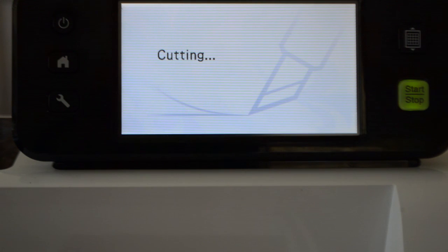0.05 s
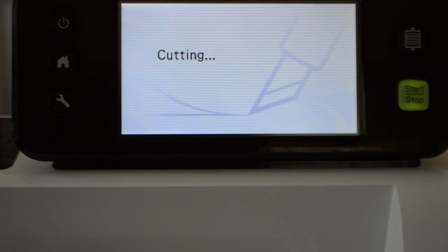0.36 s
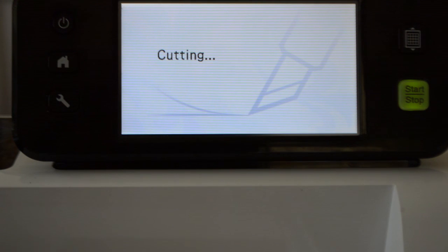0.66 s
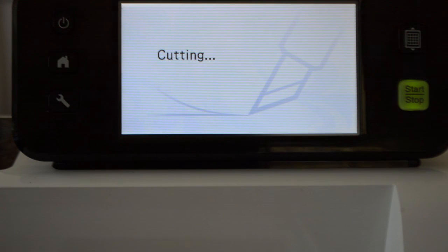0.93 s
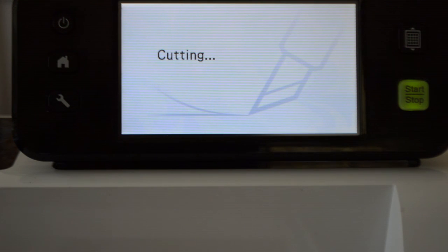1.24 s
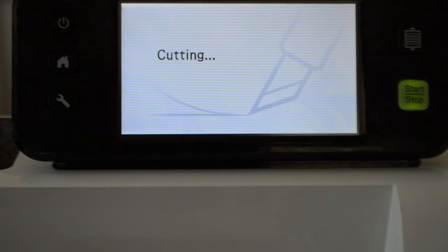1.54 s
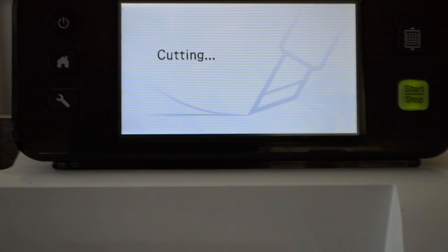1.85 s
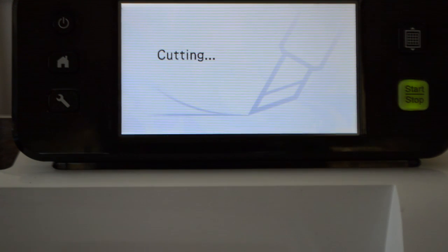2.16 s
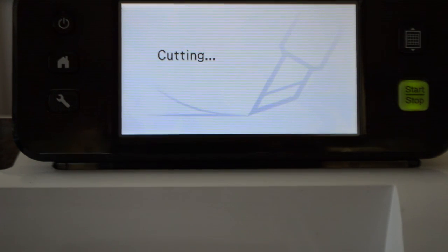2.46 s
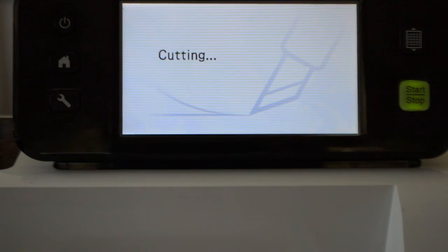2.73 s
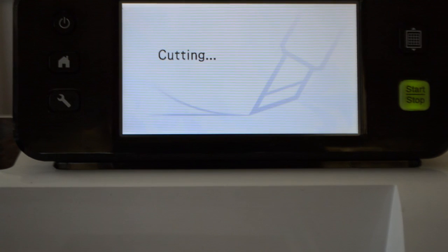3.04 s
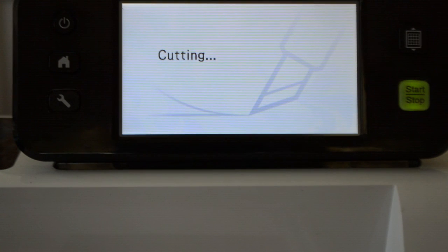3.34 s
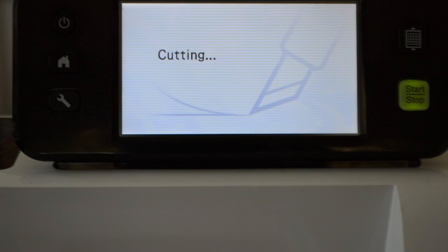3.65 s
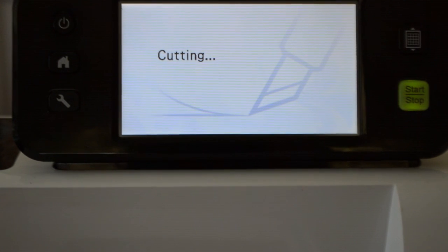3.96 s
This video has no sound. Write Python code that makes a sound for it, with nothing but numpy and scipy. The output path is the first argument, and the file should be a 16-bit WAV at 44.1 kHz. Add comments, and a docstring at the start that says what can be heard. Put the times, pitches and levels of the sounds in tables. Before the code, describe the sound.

Close up in a small room, an electronic cutting machine whirs in stop-start bursts, its plastic housing shuddering at each turn. A quieter, faster stretch ends in sharp ticks before louder whining returns, with blade holder clunks and brief rattles.

```python
"""A desktop cutting machine works close by, indoors. It opens with stepper motors whining over a hiss
of gears and belts and a ringing rail; at the turns their steps shake the housing and loose parts rattle.
The blade holder ticks as it lifts, the resting motors hum, and at 0.67 s the holder clunks down.
A faster, softer run ends in a flurry of ticks and a second rest. From 1.75 s heavy and light runs
trade places, with two more clunks and two more ticks."""
import sys
import numpy as np
from scipy import signal
from scipy.fft import rfft, irfft, next_fast_len
from scipy.io import wavfile
from scipy.ndimage import uniform_filter1d

SR = 44100
rng = np.random.default_rng(int(sys.argv[2]) if len(sys.argv) > 2 else 0)


def unload_audio(sound):
    """Save the sound as a 16-bit wav file, at the path given as the first command line argument."""
    columns = np.transpose(np.atleast_2d(sound))
    # keep every value between -1 and 1, then stretch to whole-number steps
    steps = np.round(np.clip(columns, -1, 1) * 32767)
    wavfile.write(sys.argv[1], SR, steps.astype(np.int16))


N = 176400
T = np.arange(N) / SR

CRUISE_HZ, FAST_HZ, SLOWED_HZ = 668, 955.4, 893  # step rates
# steady motor runs: start_s, end_s, step_hz, whine_db, low_overtones_db, whistle_db, hiss_db, rumble_db
LIGHT_RUNS = [(-.05, .212, CRUISE_HZ, -33, -39.5, -37, -35, -39),
              (1.995, 2.587, CRUISE_HZ, -30.5, -37, -45, -34, -35),
              (3.065, 3.64, CRUISE_HZ, -29.5, -40, -38.5, -35, -38.5)]
HEAVY_RUNS = [(.308, .448, CRUISE_HZ, -22, -35.5, -52, -32, -28.5),
              (.478, .535, CRUISE_HZ, -23.5, -31.5, -55, -40, -31),
              (1.765, 1.9, CRUISE_HZ, -20, -34.5, -21, -30.5, -29.5),
              (1.93, 1.98, CRUISE_HZ, -18, -51, -50, -34, -22),
              (2.68, 2.968, CRUISE_HZ, -18.5, -34.5, -39, -30, -28),
              (3.724, 3.858, CRUISE_HZ, -21, -38.5, -38, -31, -29.5),
              (3.895, 3.945, CRUISE_HZ, -22.5, -36, -55, -39.5, -27)]
FAST_RUNS = [(.71, 1.61, FAST_HZ, -39.5, -57, -40, -38.5, -51.5),
             (1.625, 1.705, SLOWED_HZ, -37.5, -59, -53, -40, -33.5)]
# overtones of the whine: step_multiple, relative_db
LIGHT_OVERTONES = [(2, -0.5), (6, -12), (8, -7), (10, -14)]
HEAVY_OVERTONES = [(2, -1.5), (8, -23)]
FAST_OVERTONES = [(2, 2), (3, 3), (4, -7), (8, -31)]
# EQ of the gear and belt hiss: frequency_hz, relative_db
LIGHT_HISS = [(940, -62), (1600, -15), (2070, -2), (2700, -4), (3210, -1.5), (5540, -1.5), (6270, -4),
              (9370, 0.5), (10600, 0), (11900, -11.5), (13200, -7.5), (15700, -18)]
HEAVY_HISS = [(940, -35), (1500, -6), (1850, -3.5), (2170, 4), (2750, -7.5), (3540, -1), (4240, -5.5),
              (5040, 2), (6000, -13), (6900, -4.5), (7350, 2), (11100, -5.5), (11800, -20), (13300, -12),
              (15700, -24)]
FAST_HISS = [(940, -11.5), (2750, -14.5), (3700, -10.5), (4850, -4), (6460, -14), (9280, -7),
             (11000, -11.5), (15700, -23)]
# EQ of the drive rumble: frequency_hz, relative_db
LIGHT_RUMBLE = [(50, -62), (100, -10.5), (205, 5.5), (300, -2), (450, -5.5), (640, 4), (800, -3.5),
                (1200, -9.5), (1520, -5.5), (2000, -21.5)]
HEAVY_RUMBLE = [(55, -38), (120, -16), (172, 2), (385, -1.5), (455, -3.5), (785, -2.5), (1480, -6.5),
                (2050, -18.5)]
FAST_RUMBLE = [(40, -21), (195, 7), (650, 1.5), (1200, -8.5), (1550, -0.5), (2000, -29)]
# gear tones tucked under the whine: pitch_hz, relative_db
LIGHT_GEARS = [(194, -19.5), (301, -20.5)]
HEAVY_GEARS = [(167, -21.5), (388, -17.5), (586, -15.5), (780, -15), (974, -22.5)]
FAST_GEARS = [(199, -7.5), (1513, -13.5), (1674, -18), (4974, -11)]
# a motor brakes or restarts: start_s, end_s, from_step_hz, to_step_hz, level_db, bass_boost_db
JUDDERS = [(0.217, 0.242, 672, 382.7, -23.5, 15), (0.238, 0.297, 167.9, 418.8, -16, 8.5),
           (0.282, 0.33, 419.3, 684, -20, 20), (0.445, 0.471, 667, 327.4, -17, 7),
           (.478, .497, 335.3, 674, -21.5, 4), (0.524, 0.553, 658, 261.2, -19.5, 9.5),
           (0.66, 0.717, 179.6, 556.6, -18.5, 12.5), (0.852, 0.943, 173.2, 202.4, -37.5, 14),
           (1.603, 1.633, 915, 289, -28, 18), (1.744, 1.769, 207.8, 701.4, -16, 14),
           (1.897, 1.926, 657, 338, -20, 11), (1.926, 1.987, 171.6, 422.8, -17, 9.5),
           (1.988, 2.027, 410, 646, -28.5, 19), (2.584, 2.629, 680, 248, -24, 18),
           (2.641, 2.691, 170.4, 608.8, -16.5, 15.5), (2.963, 2.997, 660.6, 331.7, -19, 8.5),
           (2.993, 3.025, 256.8, 422.5, -14, 5.5), (3.027, 3.056, 420, 636, -23, 28),
           (3.643, 3.673, 644.4, 305.5, -24, 19.5), (3.675, 3.712, 168.1, 423.8, -14, 11.5),
           (3.713, 3.743, 415, 668, -21, 20), (3.86, 3.881, 649, 333.4, -16.5, 10),
           (3.891, 3.911, 320.6, 656, -24.5, 10), (3.939, 3.966, 659, 256.6, -18, 8.5)]
# modes of the plastic housing: pitch_hz, gain_db, t60_s
HOUSING_MODES = [(178.7, -18.5, 0.14), (243, -18, 0.074), (283.4, -8, 0.028), (342, -12, 0.05),
                 (371, -17.5, 0.094), (541.7, -15.5, 0.52), (585, -17, 0.33), (651.8, -1.5, 0.072),
                 (776, 5.5, 0.025), (903, -6, 0.062), (981, -7.5, 0.13), (1120, -12.5, 0.068),
                 (1167, -13.5, 0.072), (1377, -10.5, 0.034), (1480, -4.5, 0.014)]
# bursts of loose-part chatter: start_s, end_s, level_db
RATTLES = [(0.2517, 0.269, -21.5), (0.275, 0.292, -24), (0.66, 0.664, -25.5), (0.6661, 0.674, -21),
           (1.749, 1.757, -28), (1.926, 1.931, -23), (1.94, 1.964, -26.5), (1.966, 1.985, -26.5),
           (2.609, 2.602, -23.5), (2.626, 2.638, -23), (2.6445, 2.666, -23.5), (3, 3.022, -26),
           (3.6741, 3.679, -25.5), (3.687, 3.713, -26.5)]
# EQ of the chatter: frequency_hz, relative_db
RATTLE_EQ = [(500, -7), (1250, 10.5), (1900, 1.5), (4000, 6.5), (7000, 7), (9400, 4), (10600, -4.5),
             (12200, -8.5), (15700, -28)]
# metal modes of the carriage: pitch_hz, gain_db
CARRIAGE_MODES = [(4812, -22.5), (6705, -9.5), (8815, -8), (11350, -19.5)]
# the blade holder lands: start_s, strike_db
CLUNKS = [(.6665, -11.5), (1.7485, -24), (2.6095, -16.5)]
# the blade holder ticks: start_s, ring_db, ring_hz, click_db
TICKS = [(.572, -19, 8400, -5), (.578, -0.5, 8350, -3.5), (.587, -11, 8300, -8), (1.63, -5.5, 9350, -0.5),
         (1.642, -18, 9450, -7), (1.654, -5, 9300, -5), (1.666, -4.5, 9250, -8), (1.674, -9, 9200, -24),
         (1.692, -9, 9200, -10.5), (3.204, -1.5, 10150, -2), (3.994, -2.5, 9000, 1.5)]
# EQ of a tick's click: frequency_hz, relative_db
CLICK_EQ = [(300, -15), (2800, 3), (6500, -3.5), (16000, -4)]
# the rail rings under the carriage: start_s, end_s, pitch_hz, level_db
RAIL_RINGS = [(0, .21, 9150, -48), (.74, 1.73, 9430, -49), (2.173, 2.587, 3900, -41.5),
              (2.7, 2.968, 8620, -36), (3.28, 3.64, 9700, -40)]
# the frame thrums while the mat travels: start_s, end_s, level_db
THRUMS = [(0.326, 0.568, -50), (1.864, 2.43, -46.5)]
# EQ of the thrum: frequency_hz, relative_db
THRUM_EQ = [(15, -30), (40, 2), (140, -18), (800, -52)]
# the motors rest: start_s, end_s
RESTS = [(.56, .66), (1.7, 1.75)]
# hum under holding current: pitch_hz, level_db
HUM_TONES = [(220.7, -39), (893, -45.5), (2008, -53), (3569, -57)]
# EQ of the soft noise bed: frequency_hz, relative_db
BED_EQ = [(25, -9), (110, -11), (220, -0.5), (1200, -7), (2500, -11), (6200, -12), (9300, -12),
          (16000, -34)]


def motor(runs, overtones, hiss_eq, rumble_eq, gears):
    """A stepper whines at its step rate over gear tones, tooth hiss and drive rumble."""
    speed_wobble, flutter_db, whistle_above_hz = .0018, 1.0, 3000
    clock = T + speed_wobble * np.cumsum(drift(per_s=25)) / SR
    flutter = [from_db(flutter_db * drift(per_s=25)) for _ in range(len(overtones) + 1)]
    tones, hiss_gain, rumble_gain = 0, 0, 0
    for start, end, step_hz, whine_db, low_db, whistle_db, hiss_db, rumble_db in runs:
        running = gate(start, end)
        phase = 2 * np.pi * step_hz * clock
        gear_tones = sum(from_db(db) * np.sin(2 * np.pi * hz * clock) for hz, db in gears)
        whine = from_db(whine_db) * (flutter[0] * np.sin(phase) + gear_tones)
        for (multiple, db), waver in zip(overtones, flutter[1:]):
            band_db = whistle_db if multiple * step_hz > whistle_above_hz else low_db
            whine += from_db(db + band_db) * waver * np.sin(round(multiple) * phase)
        tones += np.sqrt(2) * running * whine
        hiss_gain += running * from_db(hiss_db)
        rumble_gain += running * from_db(rumble_db)
    teeth = grains(per_s=16000, spread_db=2.5) * from_db(.86 * drift(per_s=33))  # flickering hiss
    teeth = rms_one(teeth + .35 * echoes(teeth, t60_s=.03))  # rings in the mechanism
    hiss = colour(teeth * hiss_gain, hiss_eq)
    rumble = colour(rng.standard_normal(N) * rumble_gain, rumble_eq + [(15800, -60)])
    return tones + hiss + rumble


def judders():
    """Uneven steps on a speed ramp shake the housing; each shudder swells, holds and dies."""
    jitter_steps, step_spread_db = .07, 5
    out, t = np.zeros(N + SR), T[:SR // 4]
    for start, end, from_hz, to_hz, db, bass_db in JUDDERS:
        length = end - start
        jitter, uneven = rng.standard_normal((2, len(t)))
        position = np.cumsum(np.interp(t, [0, length], [from_hz, to_hz])) / SR
        position += jitter_steps * np.interp(position, np.arange(len(t)), jitter)
        kicks = np.diff(np.floor(position), prepend=-1) * from_db(step_spread_db * uneven)
        shake = housing(kicks, bass_db)
        shake /= np.sqrt(uniform_filter1d(shake ** 2, size=800) + 1e-15)  # ride the level flat
        envelope = gate(0, length, attack_s=.0074)[:len(t)]
        at = int(start * SR)
        out[at:at + len(t)] += shake * from_db(db) * envelope
    return signal.sosfilt(signal.butter(2, (125, 3200), "band", fs=SR, output="sos"), out[:N])


def housing(force, bass_db=0, bass_below_hz=440):
    """The plastic shell rings in its modes; a bass boost lifts the low ones for weight."""
    out = 0
    for k, (hz, db, t60_s) in enumerate(HOUSING_MODES):
        decay, angle = from_db(-60 / (t60_s * SR)), 2 * np.pi * hz / SR
        gain = from_db(db + bass_db * (hz < bass_below_hz)) * (-1) ** k
        feedback = [2, -4 * decay * np.cos(angle), 2 * decay * decay]
        out += gain * signal.lfilter([1, 0, -1], feedback, force + 1e-18)
    return out


def rattles():
    """Loose parts knock hard, then chatter in a cavity; the carriage's metal rings along."""
    first_knock_db = 16
    level = sum(from_db(db) * gate(start, end, attack_s=.0006, release_s=.007)
                for start, end, db in RATTLES)
    starts, _, burst_db = np.transpose(RATTLES)
    contacts = level * grains(per_s=1000, spread_db=3.2) + strikes(starts, burst_db + first_knock_db)
    metal = sum(from_db(db) * resonance(contacts, hz, width_hz=60) for hz, db in CARRIAGE_MODES)
    cavity = echoes(contacts, t60_s=.033)
    return colour(.65 * contacts + cavity, RATTLE_EQ) + metal


def blade_holder():
    """The holder lands with a dull clunk of the housing and lifts with short, ringing ticks."""
    starts, _, _, click_db = np.transpose(TICKS)
    clicks = colour(strikes(starts, click_db), CLICK_EQ)
    rings = sum(resonance(strikes([start], db), hz, width_hz=450) for start, db, hz, _ in TICKS)
    ticks = signal.sosfilt(signal.butter(4, 11800, fs=SR, output="sos"), clicks + rings)
    clunks = housing(strikes(*np.transpose(CLUNKS)))
    return clunks + .4 * ticks + echoes(ticks, t60_s=.017)


def rail_ring():
    """Sliding friction makes the rail sing, at another pitch on each move."""
    return sum(from_db(db) * gate(start, end) * resonance(rng.standard_normal(N), hz, width_hz=240)
               for start, end, hz, db in RAIL_RINGS)


def frame_thrum():
    """The frame shudders low while the mat travels."""
    level = sum(from_db(db) * gate(start, end) for start, end, db in THRUMS)
    return colour(level * rng.standard_normal(N), THRUM_EQ)


def holding_hum():
    """Holding current makes the resting motors hum faintly."""
    resting = sum(gate(start, end) for start, end in RESTS)
    hum = sum(from_db(db) * np.sin(2 * np.pi * (hz * T + rng.random())) for hz, db in HUM_TONES)
    return np.sqrt(2) * resting * hum


def noise_bed(level_db=-41.5):
    """A soft, steady wash under everything."""
    return from_db(level_db) * colour(rng.standard_normal(N), BED_EQ)


def from_db(db):
    """Decibels to gain."""
    return 10 ** (np.asarray(db) / 20)


def rms_one(x):
    """Scale to rms 1."""
    return x / np.sqrt(np.mean(x ** 2) + 1e-20)


def drift(per_s):
    """A smooth random wander with a spread of 1."""
    hop, settle = 40, 2000
    pole = np.exp(-2 * np.pi * hop * per_s / SR)
    noise = rng.standard_normal(N // hop + settle + 2)
    slow = signal.lfilter([1], [1, -2 * pole, pole * pole], noise)[settle:]
    return np.interp(np.arange(N) / hop, np.arange(len(slow)), rms_one(slow))


def gate(start, end, attack_s=.0054, release_s=.012):
    """An envelope that rises, holds and dies away."""
    return np.clip((T - start) / attack_s, 0, 1) * np.exp(-np.clip((T - end) / release_s, 0, 30))


def colour(x, eq):
    """Apply an EQ curve with unit power gain."""
    size = next_fast_len(N + SR // 4, True) // 2 * 2
    hz, db = np.transpose(eq)
    log_hz = np.log(np.maximum(np.arange(size // 2 + 1) * SR / size, 1))
    gain = rms_one(from_db(np.interp(log_hz, np.log(hz), db)))
    cepstrum = irfft(np.log(gain))
    cepstrum[1:size // 2] *= 2  # minimum phase: nothing rings ahead of a hit
    cepstrum[size // 2 + 1:] = 0
    return irfft(rfft(x, size) * np.exp(rfft(cepstrum)))[:N]


def grains(per_s, spread_db):
    """Random contacts of uneven size."""
    sizes = from_db(spread_db * np.minimum(rng.exponential(1, N), 4)) * rng.choice([-1, 1], N)
    return rms_one(sizes * (rng.random(N) < per_s / SR))


def strikes(times, db):
    """One click at each time."""
    out = np.zeros(N)
    np.add.at(out, np.clip((np.asarray(times) * SR).astype(int), 0, N - 1), from_db(db))
    return out


def resonance(x, hz, width_hz):
    """One metallic ring, with unit power gain."""
    decay = np.exp(-np.pi * width_hz / SR)
    feedback = [1, -2 * decay * np.cos(2 * np.pi * hz / SR), decay * decay]
    return np.sqrt((1 - decay * decay) / 2) * signal.lfilter([1, 0, -1], feedback, x + 1e-18)


def echoes(x, t60_s):
    """A dense tail of reflections, with unit power gain."""
    t = T[:SR // 2]
    tail = rng.standard_normal(len(t)) * from_db(-60 * t / t60_s)
    return signal.fftconvolve(x, tail / np.linalg.norm(tail))[:N]


def scene():
    """Dry motors up front and a small, dark room on the knocks, the same in both channels."""
    motors = (motor(LIGHT_RUNS, LIGHT_OVERTONES, LIGHT_HISS, LIGHT_RUMBLE, LIGHT_GEARS)
              + motor(HEAVY_RUNS, HEAVY_OVERTONES, HEAVY_HISS, HEAVY_RUMBLE, HEAVY_GEARS)
              + motor(FAST_RUNS, FAST_OVERTONES, FAST_HISS, FAST_RUMBLE, FAST_GEARS))
    knocks = judders() + rattles() + blade_holder()
    room = signal.sosfilt(signal.butter(1, 1800, fs=SR, output="sos"), echoes(knocks, t60_s=.24))
    background = frame_thrum() + holding_hum() + noise_bed()
    return np.tile(motors + knocks + from_db(-8) * room + rail_ring() + background, (2, 1))


def record(dry):
    """Soft saturation rounds the peaks, then a steep low-pass trims the top."""
    ceiling, cutoff_hz = 1.2, 15800
    rounded = ceiling * np.tanh(dry / ceiling)
    return signal.sosfilt(signal.ellip(12, .1, 80, cutoff_hz, fs=SR, output="sos"), rounded)


dry = scene()
out = record(dry)
unload_audio(out)
```